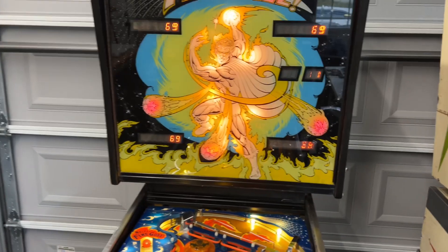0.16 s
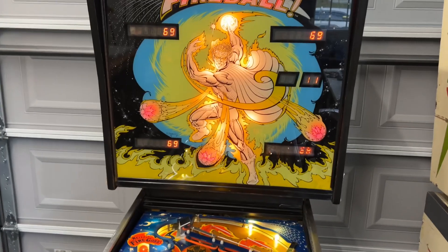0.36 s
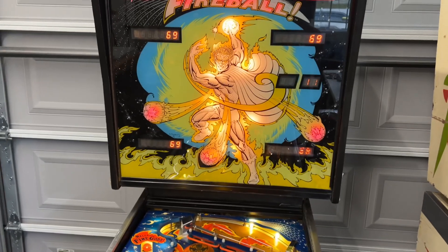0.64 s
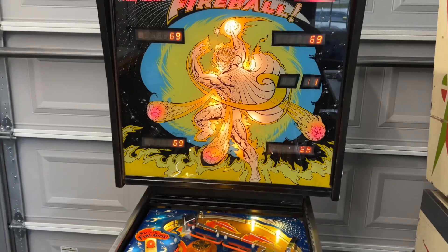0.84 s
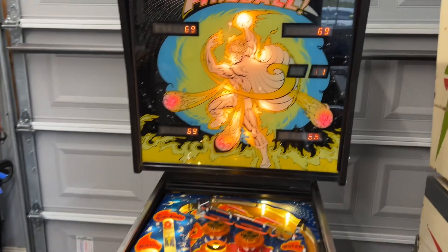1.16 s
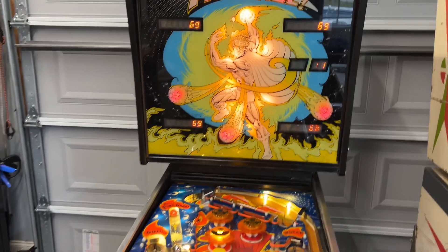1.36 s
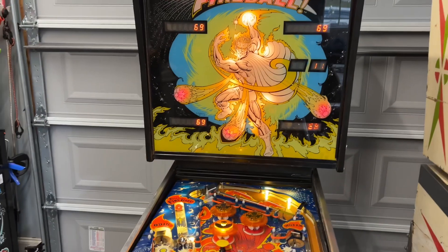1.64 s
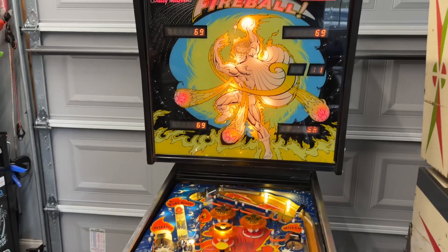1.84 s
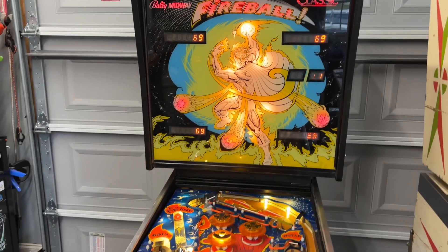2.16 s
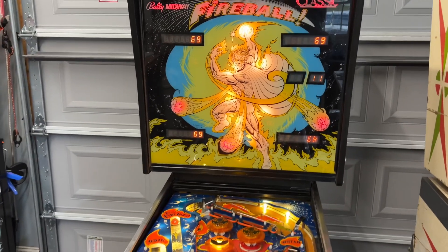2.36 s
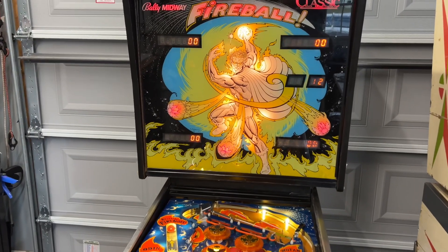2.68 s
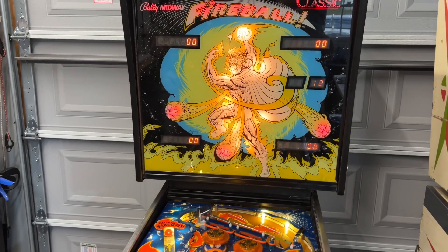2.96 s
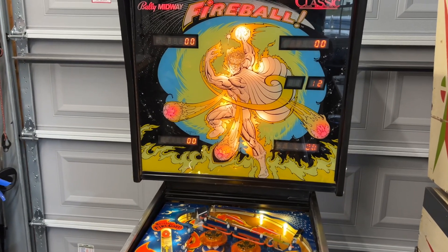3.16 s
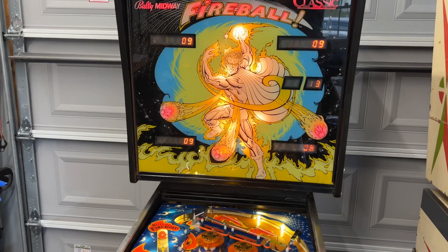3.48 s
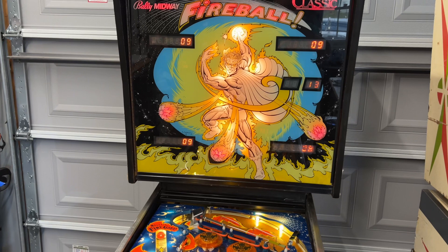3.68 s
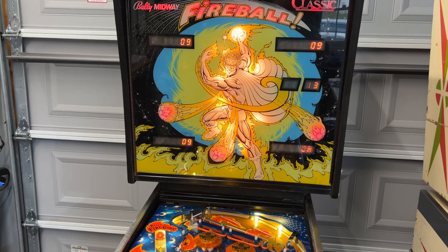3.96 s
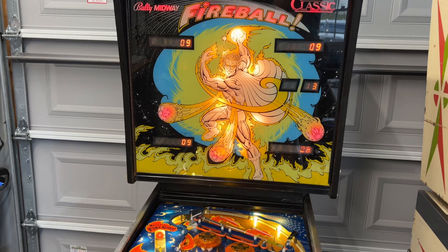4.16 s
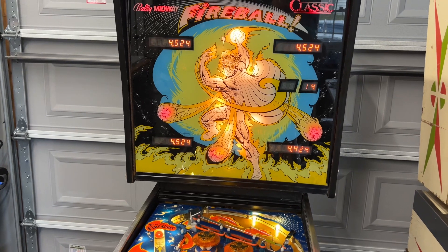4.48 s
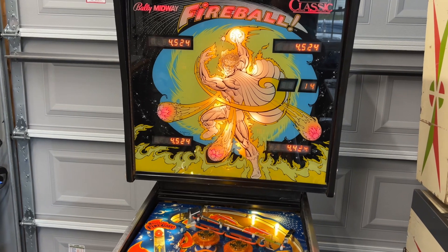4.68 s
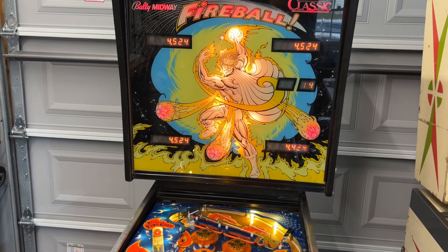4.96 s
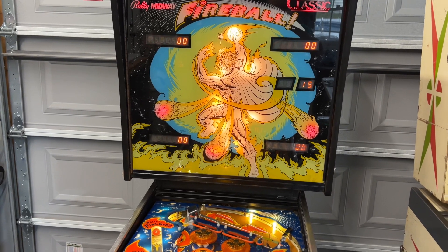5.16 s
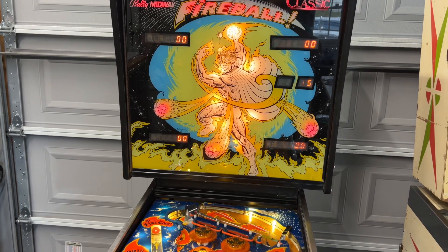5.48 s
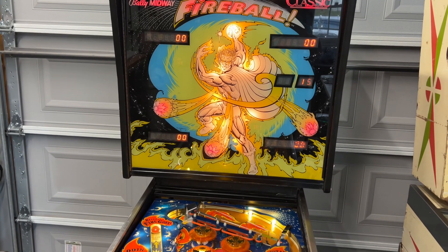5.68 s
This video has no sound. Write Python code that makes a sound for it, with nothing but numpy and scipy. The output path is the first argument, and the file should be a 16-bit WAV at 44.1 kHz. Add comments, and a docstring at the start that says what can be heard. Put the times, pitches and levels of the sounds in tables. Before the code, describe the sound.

A pinball machine hums low in a garage as a metal latch clacks in three quick sharp bursts, then small button clicks follow irregularly.

```python
"""A low hum fills a garage: a pinball machine's transformer tones, over a drone of shaped noise.
Cloth rustles as swelling filtered noise, with two dry taps close by. A metal latch clacks in three quick
bursts and thumps the cabinet front. Later a small button ticks and something wooden knocks twice further off.
Taps, latch, button and wood are bursts of contact noise that set modes (natural pitches) ringing.
Scattered reflections from the garage walls follow them."""
import sys
import numpy as np
from scipy import signal
from scipy.fft import rfft, irfft, next_fast_len
from scipy.io import wavfile
from scipy.ndimage import uniform_filter1d

SR = 44100
rng = np.random.default_rng(int(sys.argv[2]) if len(sys.argv) > 2 else 0)


def unload_audio(sound):
    """Save the sound as a 16-bit wav file, at the path given as the first command line argument."""
    columns = np.transpose(np.atleast_2d(sound))
    # keep every value between -1 and 1, then stretch to whole-number steps
    steps = np.round(np.clip(columns, -1, 1) * 32767)
    wavfile.write(sys.argv[1], SR, steps.astype(np.int16))


N = 257103


def amp(db):
    """Turns decibels into a gain."""
    return 10 ** (np.asarray(db) / 20)


def evened(x):
    """Scales to an average strength (rms) of 1."""
    return x / np.sqrt(np.mean(x ** 2) + 1e-20)


def read(points, hz):
    """Reads a table of (frequency [Hz], value) between its points, on a log-frequency axis."""
    f, value = np.transpose(points)
    return np.interp(np.log(hz + 1), np.log(f + 1), value)


def drift(rate_hz):
    """Slow random wandering of rms 1: sines from 0.6 Hz up to rate_hz, the slower ones stronger."""
    t = np.arange(N) / SR
    rates = np.geomspace(.6, rate_hz, num=12)
    return evened(sum(np.sin(2 * np.pi * (f * t + rng.random())) / np.sqrt(f) for f in rates))


# Transformer and cabinet tones: (frequency [Hz], level [dB], wavering [dB], left minus right [dB],
# share of the slow swell [ratio])
HUM_TONES = [(38.6, -67.5, .8, .3, .2), (59.6, -56.4, .3, .3, 1.6), (76.6, -61.5, 2.2, .3, -.12),
             (95, -71, 3, .3, -.3), (119.8, -58.6, 1.1, 2.2, -.1), (152.8, -71, 1.6, 2.5, .2),
             (238, -76, 2.2, 1.5, -.6), (351, -75.5, 2.2, 2.5, -.2), (378, -77.5, 2.2, 1.5, -.1)]
# Slow swell of the hum: (time [s], level [dB])
HUM_SWELL = [(0, -11.5), (.6, 1), (1.2, -1), (2.4, -1), (3.2, 0.5), (4.5, 2), (5.83, 2)]


def hum():
    """Steady tones waver a little and trade strength slowly as the microphone moves through the room."""
    t, out = np.arange(N) / SR, np.zeros((2, N))
    swell_db = np.interp(t, *np.transpose(HUM_SWELL))
    for hz, db, waver_db, pan_db, share in HUM_TONES:
        phase = 2 * np.pi * (hz * t + rng.random()) + 0.26 * waver_db * drift(2.8)
        level_db = db + waver_db * drift(6.8) + share * swell_db
        tone = np.sqrt(2) * amp(level_db) * np.sin(phase)
        out += tone * amp([[pan_db / 2], [-pan_db / 2]])
    return out


def noise(spectrum, same, balance, patchy_db):
    """Two partly alike channels of noise, rms 1, with random stronger and weaker patches."""
    frames, hz = N // 512 + 5, np.fft.rfftfreq(2048, 1 / SR)
    a, b, c, d, patches = rng.standard_normal((frames, len(hz), 5)).T
    # smooth the patches over neighbouring pitches, then over time
    patches = uniform_filter1d(patches, size=20, axis=0)
    patches = evened(uniform_filter1d(patches, size=6, axis=1))
    same = np.clip(same(hz), -1, 1)[:, None]
    left, other = a + 1j * b, c + 1j * d
    z = np.array([left, same * left + np.sqrt(1 - same ** 2) * other])
    z = z * amp(read(spectrum, hz)[:, None] + patchy_db * patches)
    z = z * amp(np.outer([.5, -.5], balance(hz)))[..., None]
    return evened(signal.istft(z, nperseg=2048, noverlap=1536)[1][:, :N])


# Colour of the drone: (frequency [Hz], relative level [dB per Hz])
DRONE_COLOUR = [(15, -53.5), (30, -17.5), (45, -11), (60, -10.5), (75, -5.5), (110, -14.5), (174, -15),
                (300, -21.5), (360, -17), (420, -24), (800, -30.5), (1200, -38), (2500, -45.5), (5000, -51),
                (9000, -55.5), (10000, -69.5), (11500, -58.5), (13000, -70), (14000, -84)]
# How alike its two channels are: (frequency [Hz], likeness [-1 to 1])
DRONE_LIKENESS = [(60, 0.9), (180, 0.8), (550, 0.48), (1650, -0.032), (4970, -0.53), (15000, -0.34)]
# Its lean to one side: (frequency [Hz], left minus right [dB])
DRONE_LEAN = [(60, 0.35), (240, 2.6), (950, 3.5), (3770, 0.69), (15000, 1.0)]
DRONE_DB = -58  # rms


def drone():
    """The steady noise of the room and cabinet, strongest in the bass."""
    sound = noise(DRONE_COLOUR, lambda hz: read(DRONE_LIKENESS, hz), lambda hz: read(DRONE_LEAN, hz),
                  patchy_db=1.5)
    return amp(DRONE_DB) * sound


# Colour of rubbed cloth: (frequency [Hz], relative level [dB per Hz])
CLOTH_COLOUR = [(350, -25.5), (600, -6), (805, -4.5), (1490, -7.5), (1990, -8), (5490, -12.5),
                (8790, -21.5), (10000, -32.5), (13000, -63.5), (22000, -120)]
# Brushes of cloth: (loudest time [s], level [dB], swell [s], fade [s], treble level [dB])
CLOTH_BRUSHES = [(0.051, -71, 0.13, .4, -3.5), (.1, -63.5, 0.058, 0.043, -19),
                 (.21, -63.5, 0.011, 0.029, -2.5), (1.302, -69, 0.3, 0.48, -2),
                 (2.38, -71, 0.16, 0.061, -0.5), (2.44, -64.5, 0.059, 0.049, -3.5),
                 (2.545, -63, 0.045, 0.034, -9.5), (2.6, -72, 0.025, .08, -7.5),
                 (2.735, -70.5, 0.034, 0.059, -10.5)]
BRUSH_DB = 6  # drop from the loudest moment over one swell or fade time
TREBLE_HZ, GRIT_DB, GRIT_S = 2400, 1, 0.014  # treble starts here; depth and smoothing time of the grit


def rustle():
    """Cloth brushes as someone shifts: gritty noise swells and fades, duller in some brushes."""
    t = np.arange(N) / SR
    cloth = noise(CLOTH_COLOUR, lambda hz: 0.2 + 0 * hz, lambda hz: 0.47 + 0 * hz, patchy_db=2.2)
    highpass = signal.butter(2, TREBLE_HZ, "high", fs=SR, output="sos")
    treble = signal.sosfiltfilt(highpass, cloth)
    # strokes hold power, so overlapping brushes add up
    strokes = np.array([amp(db - BRUSH_DB * ((t - s) / np.where(t < s, swell, fade)) ** 2) ** 2
                        for s, db, swell, fade, _ in CLOTH_BRUSHES])
    bright = amp([row[-1] for row in CLOTH_BRUSHES]) ** 2 @ strokes
    grit = evened(uniform_filter1d(rng.standard_normal(N), round(GRIT_S * SR)))
    grit = evened(amp(GRIT_DB * grit))
    return grit * (np.sqrt(strokes.sum(0)) * (cloth - treble) + np.sqrt(bright) * treble)


def add(mix, s, sound):
    """Adds a sound that starts at time s."""
    part = mix[round(s * SR):][:len(sound)]
    part += sound[:len(part)]


def colour(x, db_at):
    """Filters with the gain db_at(Hz), never sounding before the input (minimum phase)."""
    size = next_fast_len(len(x) + 2048)
    hz = abs(np.fft.fftfreq(size, 1 / SR))
    log_gain = np.log(amp(np.maximum(db_at(hz), -100)))
    response = np.exp(np.conj(signal.hilbert(log_gain)))
    return np.fft.ifft(np.fft.fft(x, size) * response).real[:len(x)]


CRACKLE_DB, CRACKLE_S = 2.5, 0.0015  # contact noise comes in uneven grains: depth, smoothing time


def contact(t, rise, length):
    """A short burst of contact noise, its strength spread evenly over all pitches."""
    grains = evened(uniform_filter1d(rng.standard_normal(len(t)), max(round(CRACKLE_S * SR), 1)))
    crackle = rng.standard_normal(len(t)) * amp(CRACKLE_DB * grains)
    z = rfft(crackle * (1 - np.exp(-t / rise)) * np.exp(-t / max(length, 3e-4)))
    burst = irfft(z / np.sqrt(uniform_filter1d(abs(z) ** 2, size=300)), len(t))
    return burst * (1 - np.exp(-t / 1e-4)) * (t < .15)


def ring(modes, longest, apart):
    """The free ringing of each mode as a bunch of close neighbours, one row each."""
    hz, db, t60 = np.transpose(modes)[..., None]
    t = np.arange(SR // 2) / SR
    fade = amp(db - 60 * t / np.minimum(t60, longest))
    fade = np.repeat(fade, apart.shape[1], axis=0)
    return fade * np.sin(2 * np.pi * (hz * (1 + apart)).reshape(-1, 1) * t)


def strikes(events, crack, modes, ring_db, longest, rise, spread, stressed=(4000, 1)):
    """Each strike is a short rattle of contact noise that sounds itself and sets the modes ringing."""
    t, out = np.arange(SR // 2) / SR, np.zeros(N)
    stress_hz, octaves = stressed
    bank = ring(modes, longest, spread * rng.standard_normal((len(modes), 20)))
    for s, db, tilt_db, length, *stress_db in events:
        body = rng.uniform(-1, 1, len(bank)) @ bank  # the neighbours share each blow by chance
        rattle = contact(t, rise, length)
        snap = colour(rattle, lambda hz: read(crack, hz))
        rung = signal.fftconvolve(rattle, body)[:len(t)]
        sound = evened(snap) + amp(ring_db) * evened(rung)

        def strike_colour(hz):
            """Tilts the treble up or down and stresses one band."""
            tilt = tilt_db * np.log2(np.clip(hz, 500, 11000) / 4000)
            band = np.exp(-(np.log2((hz + 1) / stress_hz) / octaves) ** 2)
            return tilt + sum(stress_db) * band

        sound = colour(sound, strike_colour)
        # the loudest 2 ms becomes as strong as a sine whose peak is db
        loudest = uniform_filter1d(sound ** 2, size=88).max()
        add(out, s, amp(db) * sound / np.sqrt(loudest * 2))
    return out


# Dry taps close by: (time [s], level [dB], brightness [dB per octave about 4 kHz], rattle length [s])
TAPS = [(0.047, -45, 5.5, 0.00088), (2.7, -67, 9.5, 0.0019)]
# Ringing of the tapped thing: (frequency [Hz], relative level [dB], time to fade by 60 dB [s])
TAP_MODES = [(1138, -1, 0.015), (1353, -8.5, 0.024), (1650, -1, 0.013)]
# Colour of the tap's contact noise: (frequency [Hz], relative level [dB per Hz])
TAP_COLOUR = [(600, -32), (900, 4.5), (1300, 12), (1800, 1), (2200, -33.5), (5000, -75.5)]


def dry_taps():
    """Very short contact bursts with a small, quickly fading ring."""
    return strikes(TAPS, TAP_COLOUR, TAP_MODES, ring_db=-8, longest=.05, rise=0.0006, spread=0.04)


# How fast the garage falls quiet: (frequency [Hz], time to fade by 60 dB [s])
GARAGE_FADE = [(300, 0.39), (1000, 0.52), (3000, 0.37), (6000, 0.49), (10000, 0.3), (16000, 0.16)]
# How alike the reflections are at the two microphone ports: (frequency [Hz], likeness [0 to 1])
GARAGE_LIKENESS = [(300, 0.78), (1000, 0.64), (2500, 0.09), (6000, 0.14)]
ECHO_PATCHY_DB = 2  # the walls return some pitches and moments more strongly than others


def garage(x):
    """Sparse reflections of random sign, each band dying at its own speed."""
    taps = np.zeros((2, SR))
    at = np.arange(200, SR - 20, 20) + rng.integers(0, 20, (2, (SR - 201) // 20))
    np.put_along_axis(taps, at, rng.choice([-1., 1.], at.shape), 1)
    hz, t, z = signal.stft(taps, SR, nperseg=256)
    same = np.clip(read(GARAGE_LIKENESS, hz), 0, 1)[:, None]
    z = np.array([z[0], same * z[0] + np.sqrt(1 - same ** 2) * z[1]])
    patches = uniform_filter1d(rng.standard_normal(z.shape[1:]), size=5, axis=0)
    patches = evened(uniform_filter1d(patches, size=7, axis=1))
    fade = amp(-60 * t / read(GARAGE_FADE, hz)[:, None])
    tail = signal.istft(z * amp(ECHO_PATCHY_DB * patches) * fade, SR, nperseg=256)[1]
    return signal.fftconvolve(x[None], tail / np.linalg.norm(tail[0]), axes=1)[:, :N]


# Latch strikes: (time [s], level [dB], brightness [dB per octave about 4 kHz], rattle length [s],
# push on the cabinet front [dB], clang [dB], upper knock of the cabinet front [dB])
LATCH_CLACKS = [(0.2265, -41.5, 1.5, 0.0089, -59, -1, -6), (0.2465, -45, 4.5, 0.0086, -58.5, -6, -5.5),
                (0.2762, -40, -2, 0.0065, -50, -11.5, -1), (0.2946, -23, 1.5, 0.0029, -55.5, 6.5, 4),
                (0.4255, -37, 1, 0.006, -53.5, -5.5, 4), (0.434, -32.5, 0, 0.0046, -46, 0.5, -4),
                (0.4522, -31.5, -2, 0.007, -49, -3, -2.5), (0.4708, -24.5, 3, 0.0023, -48.5, 5.5, 1.5),
                (0.6012, -37.5, 3.5, 0.0061, -57.5, -10.5, -3.5),
                (0.607, -33, 0.5, 0.0087, -40.5, -7.5, -11.5), (0.6275, -39.5, -3, 0.004, -46, -4.5, -3.5),
                (0.6418, -25.5, 0.5, 0.002, -57.5, 4, -1.5)]
# Ringing of the latch metal: (frequency [Hz], relative level [dB], time to fade by 60 dB [s])
LATCH_MODES = [(2090, -12, 0.3), (2300, -15.5, 0.16), (2820, -10.5, 0.12), (3140, -5, 0.042),
               (3450, -5.5, 0.45), (4250, -16, 0.14), (4710, -12, 0.51), (5350, -6.5, 0.25),
               (5930, 0.5, 0.16), (6480, -8.5, 0.095), (6400, -12, 0.2), (7500, -15.5, 0.15)]
# Colour of the latch's contact noise: (frequency [Hz], relative level [dB per Hz])
LATCH_COLOUR = [(410, -48.5), (700, -19.5), (1250, -19), (1600, -14.5), (1800, -17.5), (2070, -8.5),
                (2520, -16.5), (3240, 0), (4230, -10.5), (5880, -6.5), (9600, -13.5), (10300, -23),
                (11200, -17.5), (12800, -22.5), (13900, -43), (15200, -12), (16500, -42.5)]
BOUNCE_S, BOUNCE_DB, BOUNCE_DULLS_DB = .0062, -8.5, -4.5  # delay, level, brightness [dB per octave]
LATCH_CLANG = (2600, 0.25)  # band that the clang column stresses: centre [Hz], width [octaves]


def latch_clacks():
    """Metal strikes metal and rings; every strike bounces once, softer and duller."""
    first = [row[:4] + row[5:6] for row in LATCH_CLACKS]
    bounces = [(s + BOUNCE_S, db + BOUNCE_DB, tilt_db + BOUNCE_DULLS_DB, length, clang_db)
               for s, db, tilt_db, length, clang_db in first]
    return strikes(first + bounces, LATCH_COLOUR, LATCH_MODES, ring_db=-8.5, longest=.5, rise=.004,
                   spread=.018, stressed=LATCH_CLANG)


# How the latch reaches the two microphone ports, two lists:
# (frequency [Hz], left leads by [radians]) and (frequency [Hz], left minus right [dB])
LATCH_AT_PORTS = ([(500, 1.5), (2000, -1.5), (3500, 1.25), (8000, 2), (11800, -7), (16400, -11.5)],
                  [(100, -5), (400, 3.5), (1220, 4.5), (3330, -7), (5500, 7.5), (9080, -1), (15000, 0.5)])


def latch_at_ports(x):
    """The same wave reaches the two ports with a phase and level offset."""
    phase, balance = LATCH_AT_PORTS
    hz = np.fft.rfftfreq(N, 1 / SR)
    half = amp(read(balance, hz) / 2) * np.exp(.5j * read(phase, hz))
    return irfft(rfft(x) * np.array([half, 1 / half]), N)


# Ringing of the cabinet front: (frequency [Hz], relative level [dB], time to fade by 60 dB [s])
PANEL_MODES = [(79, -8, .13), (97, -12, .08), (172, -20, .15), (238, -10, .18), (338.5, 1, .11),
               (370, -10, .1), (520, 8, .055), (1010, -7, .05)]
# The cabinet front rocks and settles softly: (time [s], level [dB])
PANEL_SETTLES = [(.443, -33), (0.468, -39), (0.652, -38), (0.698, -53), (.717, -33), (0.767, -43)]
PUSH_LAG_S, PUSH_S, SETTLE_S = .0035, 0.0018, 0.0053  # delay after a strike; lengths of the two pushes
UPPER_KNOCK_HZ = 450


def cabinet_thumps():
    """Soft pushes ring the cabinet front; longer ones sound lower; it radiates no deep bass."""
    t, out = np.arange(SR // 2) / SR, np.zeros(N)
    pushes = [(row[0] + PUSH_LAG_S, row[4], PUSH_S, row[6]) for row in LATCH_CLACKS]
    pushes += [(s, db, SETTLE_S, 0) for s, db in PANEL_SETTLES]
    for s, db, length, upper_db in pushes:
        signs = rng.choice([-1, 1], len(PANEL_MODES))
        body = np.zeros(len(t))
        for sign, (hz, level_db, t60) in zip(signs, PANEL_MODES):
            fade = amp(level_db + upper_db * (hz > UPPER_KNOCK_HZ) - 60 * t / t60)
            body += sign * fade * np.sin(2 * np.pi * hz * t)
        push = np.sin(np.pi * np.clip(t[:400] / length, 0, 1)) ** 2
        add(out, s, amp(db) * signal.fftconvolve(body, push / push.sum()))
    return signal.sosfilt(signal.butter(4, 65, "high", fs=SR, output="sos"), out)


# Button ticks: (time [s], level [dB], brightness [dB per octave about 4 kHz], first touch level [dB],
# first touch lead [s], ping [dB], rebound level [dB], rebound delay [s])
BUTTON_TICKS = [(1.8475, -55.5, -4, -72, 0.021, -14, -77, 0.054),
                (2.3722, -54, 9.5, -77, .008, -18, -85, 0.055), (3.189, -48.5, 9, -59, 0.015, 2, -77, .06),
                (3.367, -65, -10, -70.5, .018, 0, -93, 0.067), (3.754, -53.5, 12, -76, 0.02, 8, -82, 0.058),
                (3.937, -61.5, -0.5, -64, 0.0075, 2, -87, 0.065),
                (4.132, -49, 14, -64.5, 0.017, 10, -76, .055),
                (4.825, -49.5, 10.5, -53, 0.016, 3.5, -65.5, .04),
                (5.3307, -50.5, 13.5, -57.5, 0.018, 6, -67, 0.047),
                (5.486, -64, -5, -86, 0.017, -15, -87, .06),
                (5.5422, -52, -9.5, -83, 0.015, 6.5, -66, 0.045)]
# Ringing of the button: (frequency [Hz], relative level [dB], time to fade by 60 dB [s])
BUTTON_MODES = [(4230, -12.5, 0.039), (5600, -16, 0.03), (8200, -3, 0.017), (10620, -11, 0.033)]
# Colour of the button's contact noise: (frequency [Hz], relative level [dB per Hz])
BUTTON_COLOUR = [(1500, -45), (2100, -12), (2800, -17), (3300, -20), (3750, -11), (4400, 4), (5030, -3),
                 (5840, -1), (6500, -5), (7000, -9), (7700, -7), (8500, -5), (9300, -8), (9960, -18),
                 (11000, -13), (13700, -42), (15700, -16.5), (16100, -29), (16500, -49)]
TICK_S = .0026  # rattle length
BUTTON_PING = (4370, 0.11)  # band that the ping stresses: centre [Hz], width [octaves]


def button_ticks():
    """A first touch, half as tilted in brightness, then the tick itself."""
    events = []
    for s, db, tilt_db, touch_db, lead, ping_db, *_ in BUTTON_TICKS:
        events.append((s - lead, touch_db, tilt_db / 2, TICK_S, ping_db))
        events.append((s, db, tilt_db, TICK_S, ping_db))
    return strikes(events, BUTTON_COLOUR, BUTTON_MODES, ring_db=-14, longest=.035, rise=.0012,
                   spread=.06, stressed=BUTTON_PING)


REBOUND_RISE_S, REBOUND_S, REBOUND_PING_DB = .012, .008, 18  # onset time, rattle length, ping stress


def button_rebounds():
    """The button rebounds after each tick with a short soft ping."""
    events = [(s + delay, db, 0, REBOUND_S, REBOUND_PING_DB) for s, *_, db, delay in BUTTON_TICKS]
    return strikes(events, BUTTON_COLOUR, BUTTON_MODES, ring_db=-14, longest=.035, rise=REBOUND_RISE_S,
                   spread=.04, stressed=BUTTON_PING)


def left_later(x, lag_s):
    """The same wave reaches the left port lag_s after the right one."""
    half = np.exp(-1j * np.pi * np.fft.rfftfreq(N, 1 / SR) * lag_s)
    return irfft(rfft(x) * np.array([half, 1 / half]), N)


# Wooden knocks: (time [s], level [dB], brightness [dB per octave about 4 kHz], rattle length [s])
WOOD_KNOCKS = [(4.4605, -45.5, -3.5, 0.012), (5.582, -48, -7, 0.012)]
# Ringing of the wood: (frequency [Hz], relative level [dB], time to fade by 60 dB [s])
WOOD_MODES = [(622, -1, 0.12), (717, 0, .12), (840, -2, 0.12), (1072, -3, 0.1), (1235, -3, .1),
              (1560, -7, 0.09), (1900, -8, 0.07), (2400, -9, .06), (4700, -21, 0.037)]
# Colour of the knock's contact noise: (frequency [Hz], relative level [dB per Hz])
WOOD_COLOUR = [(400, -50), (500, -18), (590, 1), (1060, 2), (1500, 0.5), (1900, 0), (2500, -4), (2950, -14),
               (3900, -20), (4700, -14), (5500, -23), (9000, -33.5), (11000, -76.5)]


def wooden_knocks():
    """Contact noise rings broad wooden modes that fade quickly."""
    return strikes(WOOD_KNOCKS, WOOD_COLOUR, WOOD_MODES, ring_db=-14, longest=.2, rise=.001, spread=.06)


# share that returns from the walls
TAP_WET_DB, LATCH_WET_DB, BUTTON_WET_DB, WOOD_WET_DB = -16, -6.5, -5, 2.5
BUTTON_LAG_S = 0.0002433  # the left port hears the button later


def scene():
    """Direct hits at the ports, their return from the walls, and the steady sounds and cloth."""
    steady = hum() + drone()
    cloth = rustle()
    tap, latch, thumps = dry_taps(), latch_clacks(), cabinet_thumps()
    button, rebound, wood = button_ticks(), button_rebounds(), wooden_knocks()
    lean_left = amp([[1.5], [-1.5]])
    direct = tap + latch_at_ports(latch) + left_later(button + rebound, BUTTON_LAG_S)
    direct = direct + (thumps + wood) * lean_left
    wet = amp(TAP_WET_DB) * tap + amp(LATCH_WET_DB) * latch
    wet += amp(BUTTON_WET_DB) * button + amp(WOOD_WET_DB) * wood
    return direct + garage(wet) + steady + cloth


EDGE_HZ = 16400  # highest pitch let through


def record(dry):
    """The band limit of the recorder: a steep low-pass filter."""
    lowpass = signal.firwin(511, EDGE_HZ, window=("kaiser", 9), fs=SR)
    return signal.oaconvolve(dry, lowpass[None], "same")


dry = scene()
out = record(dry)
unload_audio(out)
```